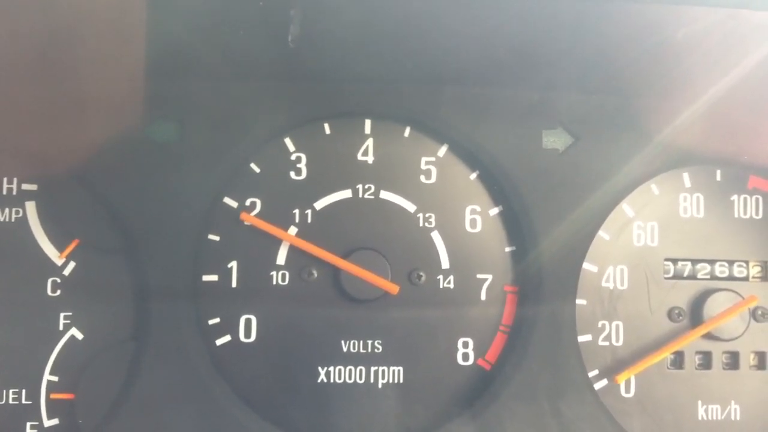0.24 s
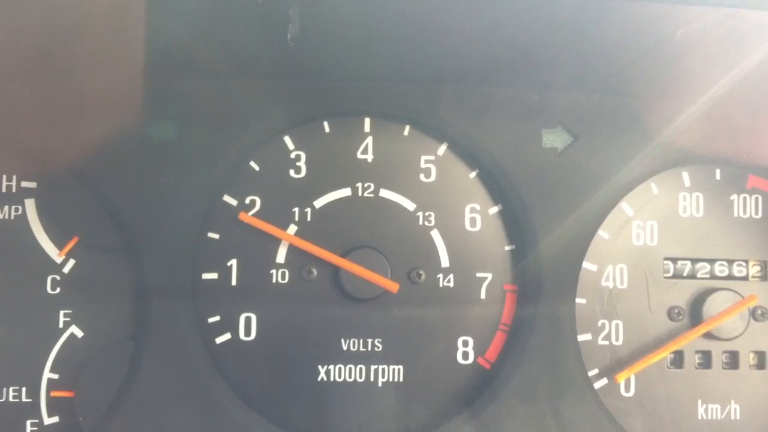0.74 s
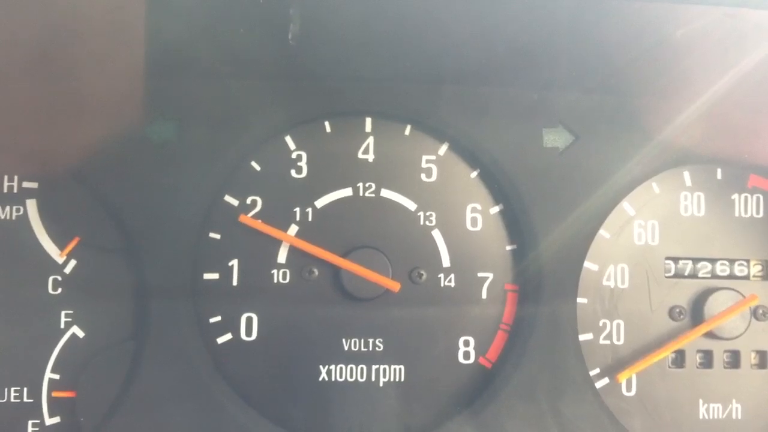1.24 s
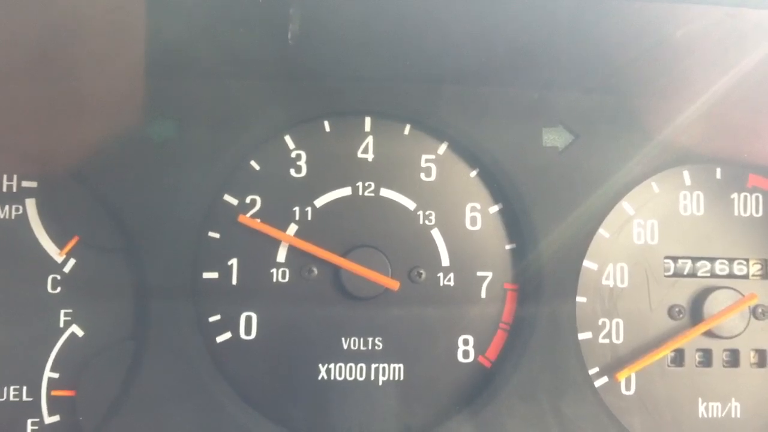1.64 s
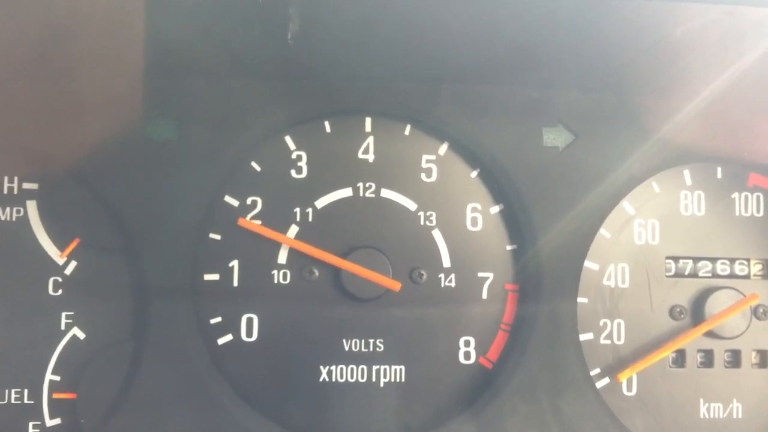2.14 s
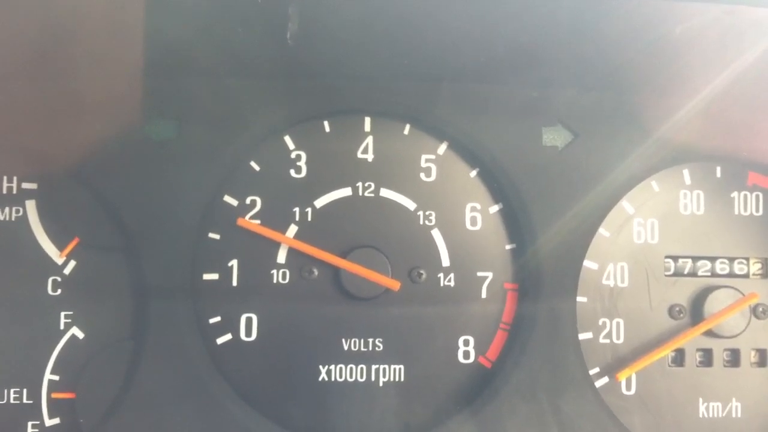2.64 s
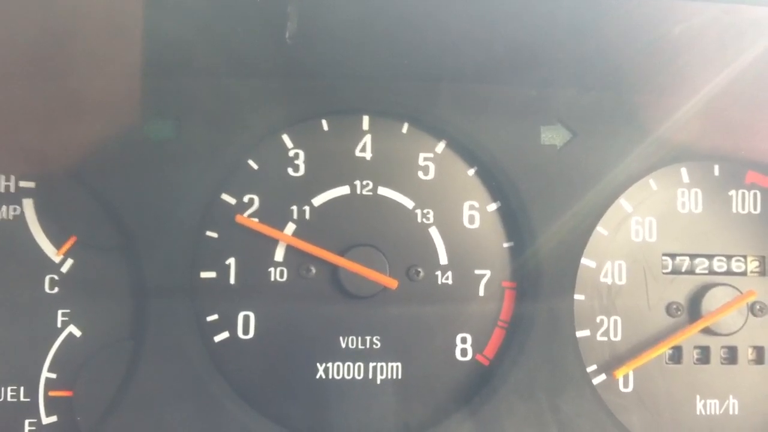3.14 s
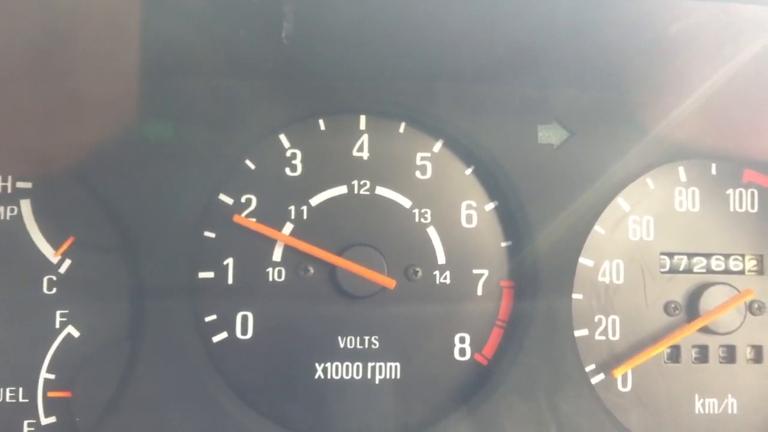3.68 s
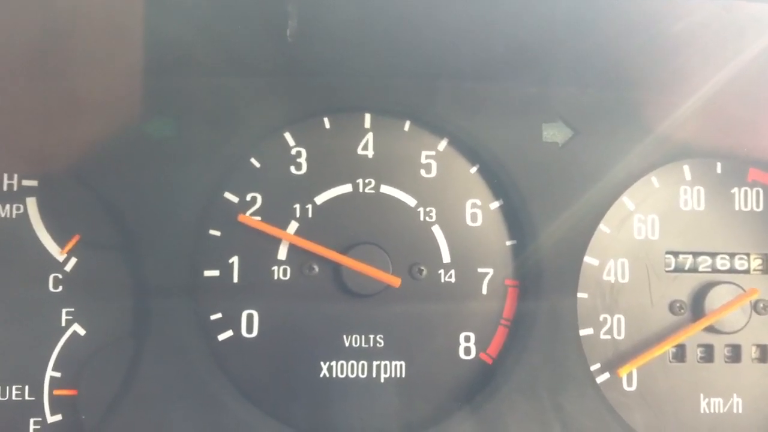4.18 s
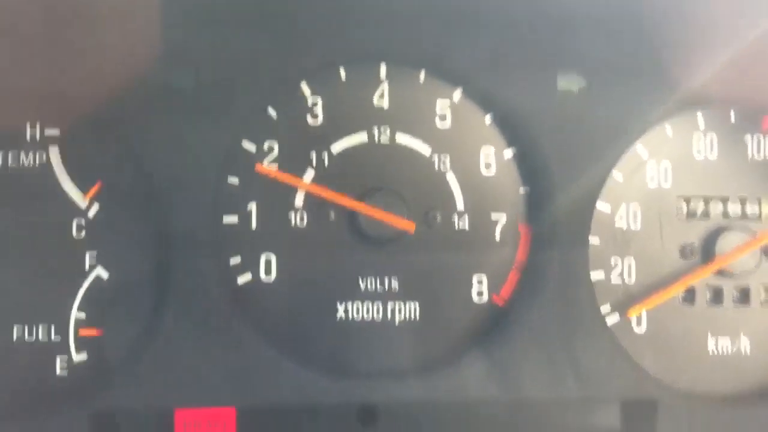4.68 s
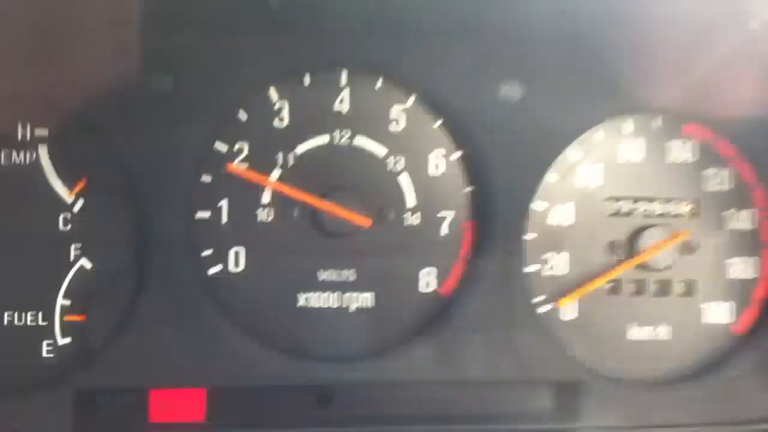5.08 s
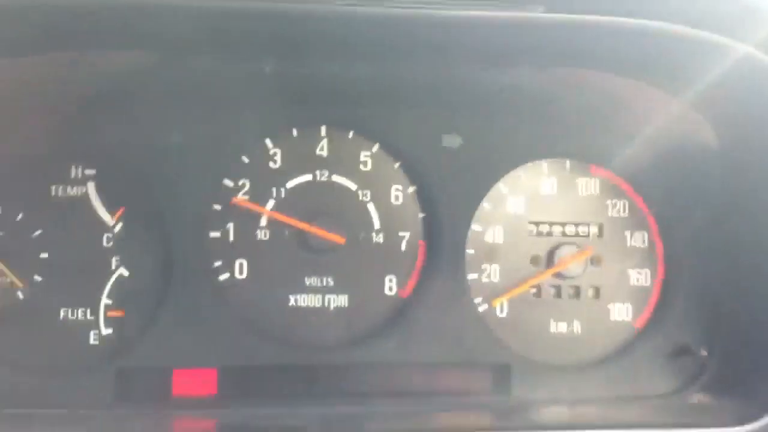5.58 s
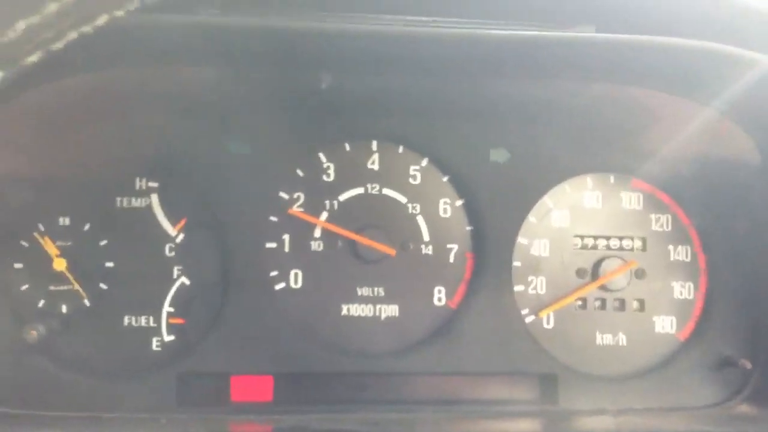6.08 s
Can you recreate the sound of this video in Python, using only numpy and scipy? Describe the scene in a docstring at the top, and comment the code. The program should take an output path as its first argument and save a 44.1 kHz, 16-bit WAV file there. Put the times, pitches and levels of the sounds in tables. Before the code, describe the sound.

From the driver's seat, a rotary engine idles in a lumpy pulse, surging and sagging about four times a second.

```python
"""A ported rotary engine lopes at a fast idle, heard from the driver's seat.
About four times a second it catches, speeds up over some six firings, then misfires and sags.
Intake air hisses ahead of each firing; the firing booms through exhaust and cabin and shakes the panels.
A driven accessory whines with the shaft throughout. Catches near 1.6, 3.2 and 5.1 s spit harder.
Mostly between 4.3 and 5.5 s the listener leans back from the dials and the tone colour shifts."""
import sys
import numpy as np
from scipy import signal
from scipy.fft import rfft, irfft, next_fast_len
from scipy.io import wavfile
from scipy.ndimage import uniform_filter1d, map_coordinates

SR = 44100
rng = np.random.default_rng(int(sys.argv[2]) if len(sys.argv) > 2 else 0)


def persist_wave(psi):
    """Save psi, clipped to +-1, as 16-bit WAV."""
    counts = np.round(np.clip(psi, -1, 1) * 32767).astype(np.int16)
    wavfile.write(sys.argv[1], SR, np.atleast_2d(counts).T)


N = 278712

# Spells of even loping. Each row: start in seconds, surge count, shaft turns per surge, stumbles as 0 or 1.
LOPE_SPELLS = [(-0.172, 3, 14, 0), (0.489, 1, 12, 0), (0.677, 4, 14, 1), (1.576, 4, 14, 1),
               (2.493, 1, 16, 1), (2.756, 4, 14, 0), (3.666, 1, 14, 1), (3.893, 1, 16, 1),
               (4.159, 3, 14, 1), (4.856, 1, 12, 1), (5.054, 1, 11, 0), (5.239, 2, 13, 0),
               (5.683, 3, 14, 0)]
# Combustion, clean surge then stumbling surge. Each row: share burnt on successive turns from the catch.
BURN_SHARES = [(1, 1, 1, 1, 1, .95, .25, 0), (1, .25, 1, 1, 1, .95, .45, .75)]
# Hard catches. Each row: time in seconds, extra firing level in dB, extra hiss in dB.
HARD_CATCHES = [(1.576, 0.5, 3.5), (3.209, 2, 4.5), (5.054, 1.5, 2.5)]
# Exhaust and cabin resonances. Each row: frequency in Hz, width in Hz, gain in dB.
BOOM_MODES = [(97, 8, -2), (110, 12, 3), (131, 16, 4.5), (187, 12, 6), (199, 13, 6), (221, 32, 5),
              (278, 20, -6), (338, 14, -7), (385, 20, -8), (504, 13, -1), (580, 50, -16)]
# Body shell transmission. Each row: frequency in Hz, gain at the dials in dB, gain leaning back in dB.
SHELL_GAINS = [(45, -18, -18), (62, -12.5, -9), (97, 2, -4), (139, -2.5, 2.5), (217, 1.5, 5), (233, 1.5, 1),
               (338, -0.5, -2), (524, -1, -6.5), (616, -5, -8), (790, -13.5, -7), (1500, -6, -20)]
# Listener position. Each row: time in seconds, lean from 0 (at the dials) to 1 (back).
LEAN_PATH = [(0, 0.09), (4.3, 0.18), (5.0, 0.38), (5.45, 1), (6.32, 0.92)]
# Engine bay and dash resonances. Each row: frequency in Hz, width in Hz, gain in dB.
PANEL_MODES = [(474.4, 15.3, 16.5), (587, 32, 7.5), (660, 24, 4.5), (940, 52, -8), (1053, 73, 14),
               (1273, 94, 2.5)]
# Intake hiss. Each row: frequency in Hz, relative density in dB.
INTAKE_SPECTRUM = [(600, -37), (1500, -3), (2500, 3.5), (3700, -0.5), (5300, 2), (6500, 1), (7800, -2.5),
                   (8900, 0.5), (10200, -4.5), (13000, -5), (15500, -9)]
# Accessory partials. Each row: harmonic number, level at the dials in dB, level leaning back in dB.
WHINE_PARTIALS = [(1, -49.5, -49), (2, -69, -51.5), (3, -54, -50), (4, -55, -53), (5, -52.5, -56),
                  (6, -56.5, -58.5)]
# Dash panel rung by the whine. Each row: frequency in Hz, width in Hz, gain in dB.
DASH_MODES = [(1072, 20, 8)]
# Narrow sizzle near 9 kHz in the hiss. Each row: frequency in Hz, relative density in dB.
SIZZLE_SPECTRUM = [(7000, -20), (8400, -11), (8900, 2), (9500, -6), (11000, -20)]
# Engine bay hollow. Each row: frequency in Hz, width in Hz, gain in dB.
HOLLOW_MODES = [(712.5, 14, 0)]
# Steady whirr. Each row: frequency in Hz, relative density in dB.
WHIRR_SPECTRUM = [(20, 3), (60, 11), (300, 18), (800, 17), (1400, 8), (2300, 3), (4500, 3), (6300, 0),
                  (7800, -2.5), (9000, -1), (12000, -6.5), (15500, -9)]

LOPE_END_S = 6.39
PIPE_ECHO_S, PIPE_ECHO_SHARE = .0084, .53
WHINE_CYCLES_PER_TURN = 17.08
FIRING_DB, FIRING_STUMBLE_DB, FIRING_LEAN_DB = -6.1, -.6, -1.35  # relative pulse sizes
GULP_DB, GULP_FADE_DB_PER_TURN, GULP_LEAN_DB = 3.7, .5, .5  # relative intake gulp sizes
TOP_HZ = 15800


def shaft(kick):
    """Firings add speed, friction takes it back. Per turn: time, share burnt, turn in surge, stumbles."""
    ends_s = [spell[0] for spell in LOPE_SPELLS[1:]] + [LOPE_END_S]
    rows = []
    for (start_s, surges, turns, stumbles), end_s in zip(LOPE_SPELLS, ends_s):
        turn = np.tile(np.arange(round(turns)), round(surges))
        burnt = np.pad(BURN_SHARES[round(stumbles)], (0, round(turns)))[turn]
        period = 1 / (1 + kick * np.cumsum(burnt - burnt.mean()))
        times_s = start_s + (end_s - start_s) * (np.cumsum(period) - period) / period.sum()
        rows += [(*row, round(stumbles)) for row in zip(times_s, burnt, turn)]
    return np.transpose(rows)


def spits(times_s, decay_s):
    """A hard catch fades over a few firings. Per turn: extra firing dB, extra hiss dB."""
    extra_db = np.zeros((2, len(times_s)))
    for start_s, bang_db, hiss_db in HARD_CATCHES:
        age_s = times_s - times_s[np.argmin(np.abs(times_s - start_s))]
        fade = (age_s >= 0) * np.exp(-np.abs(age_s) / decay_s)
        extra_db += np.outer([bang_db, hiss_db], fade)
    return extra_db


def charges(times_s, burnt, turn, stumbles):
    """Exhaust pulse and intake gulp sizes per turn. The rich charge after a misfire bangs hardest."""
    lean = np.interp(times_s, *np.transpose(LEAN_PATH))
    spit_bang_db, spit_hiss_db = spits(times_s, decay_s=.024)
    bang_db = FIRING_DB + FIRING_STUMBLE_DB * stumbles + FIRING_LEAN_DB * lean + spit_bang_db
    gulp_db = GULP_DB - GULP_FADE_DB_PER_TURN * turn + GULP_LEAN_DB * lean + spit_hiss_db
    rich_db = .8 * burnt * (1 - np.roll(burnt, 1))
    spread_db = np.where(burnt > .5, .7, 2.2)  # misfires are the most uneven
    bang_scatter, gulp_scatter = rng.standard_normal((2, len(times_s)))
    sizes = amp(bang_db + rich_db + spread_db * bang_scatter)
    gulps = burnt * amp(gulp_db + 1.56 * gulp_scatter)
    return sizes, gulps


def exhaust(times_s, sizes, burnt, jitter_s, gas_db, unburnt_db):
    """Each port opening sends a pulse down the pipe and rings the cabin. Bangs echo once."""
    times_s = times_s + jitter_s * rng.standard_normal(len(times_s))
    bangs = pulses(times_s, sizes * burnt)
    gas = puffs(times_s, sizes * burnt, rise_s=.001, decay_s=.007) * rng.standard_normal(N)
    bangs = bangs + amp(gas_db) * np.std(bangs) * gas
    echoed = filtered(bangs, lambda f: 1 + PIPE_ECHO_SHARE * np.exp(-2j * np.pi * f * PIPE_ECHO_S))
    unburnt = pulses(times_s - .002, sizes * (1 - burnt))
    dull_puffs = filtered(unburnt, lambda f: 1 / (1 + 1j * f / 200))
    drive = echoed + amp(unburnt_db) * dull_puffs
    cabin = lambda f: ring(BOOM_MODES, f) * band(f, 70, 404) * band(f, 70, 4000)
    return -unit(filtered(drive, cabin))


def body_shell(x, lean):
    """The body muffles the exhaust; the colour depends on the place in the cabin."""
    hz, near_db, back_db = np.transpose(SHELL_GAINS)
    return (1 - lean) * coloured(x, hz, near_db) + lean * coloured(x, hz, back_db)


def panel_rasp(times_s, sizes, steady):
    """The engine shakes the panels, harder at each firing."""
    shake = (steady + puffs(times_s, sizes, rise_s=.0016, decay_s=.014)) * rng.standard_normal(N)
    return unit(filtered(shake, lambda f: ring(PANEL_MODES, f) * band(f, 240, 1440)))


def intake(times_s, gulps, lead_s, grain_db):
    """Air hisses in just ahead of each firing, slightly gritty."""
    flow = puffs(times_s - lead_s, gulps, rise_s=.016, decay_s=.0105)
    return flow * unit(noise(INTAKE_SPECTRUM) * amp(grain_db * wobble(700)))


def accessory_whine(times_s, lean, slip, flutter_db, fuzz, swell_db):
    """A belt-driven accessory tracks the shaft and swells with its speed; its overtones are fuzzy."""
    mid_turn_s = (times_s[1:] + times_s[:-1]) / 2
    shaft_hz = np.interp(np.arange(N) / SR, mid_turn_s, 1 / np.diff(times_s))
    whine_hz = WHINE_CYCLES_PER_TURN * shaft_hz * (1 + slip * wobble(60))
    phase = 2 * np.pi * np.cumsum(whine_hz) / SR
    surge = unit(shaft_hz - uniform_filter1d(shaft_hz, size=SR // 2))
    whine = np.zeros(N)
    for k, near_db, back_db in WHINE_PARTIALS:
        blur = 1 + fuzz * (k > 1) * (k + 2) / 2 * (wobble(220) + 1j * wobble(220))
        partial = np.real(blur * np.exp(1j * k * phase))
        envelope = amp(flutter_db * wobble(25) + swell_db * surge / k)
        whine += amp(near_db + lean * (back_db - near_db)) * unit(envelope * partial)
    dash = filtered(whine, lambda f: ring(DASH_MODES, f))
    return whine + (1 - lean) * dash


def high_sizzle(times_s, sizes, spread_db):
    """Narrow sizzle near 9 kHz in the hiss, uneven from firing to firing."""
    bursts = sizes * amp(spread_db * rng.standard_normal(len(times_s)))
    return puffs(times_s, bursts, rise_s=.0022, decay_s=.0085) * noise(SIZZLE_SPECTRUM)


def bay_howl():
    """A hollow in the engine bay rings with noise."""
    return unit(filtered(rng.standard_normal(N), lambda f: ring(HOLLOW_MODES, f) ** 2))


def background(whirr_db, rumble_db):
    """Steady whirr over a faint rumble."""
    whirr = noise(WHIRR_SPECTRUM)
    rumble = noise([(12, -4), (28, 0), (55, -2), (120, -18), (400, -70)])
    return amp(whirr_db) * whirr + amp(rumble_db) * rumble


def amp(db):
    """Amplitude ratio from dB."""
    return 10 ** (np.asarray(db) / 20)


def unit(x):
    """x scaled to rms 1."""
    return x / np.sqrt(np.mean(x ** 2) + 1e-20)


def wobble(rate_hz):
    """Smooth random curve, rate_hz knots a second."""
    knots = rng.standard_normal(int(N * rate_hz / SR) + 4)
    return map_coordinates(knots, [np.arange(N) * rate_hz / SR])


def filtered(x, response):
    """x through a complex frequency response."""
    size = next_fast_len(N + SR // 2)
    return irfft(rfft(x, size) * response(np.fft.rfftfreq(size, 1 / SR)), size)[:N]


def coloured(x, hz, db):
    """x through a gain curve on a log-frequency axis."""
    return filtered(x, lambda f: amp(np.interp(np.log(f + 1), np.log(hz), db)))


def noise(spectrum):
    """Noise of rms 1 shaped by (Hz, dB) points."""
    return unit(coloured(rng.standard_normal(N), *np.transpose(spectrum)))


def ring(modes, f):
    """Causal response of a set of resonances."""
    return sum(amp(db) * 1j * f * width_hz / (hz * hz - f * f + 1j * f * width_hz)
               for hz, width_hz, db in modes)


def band(f, low_hz, high_hz):
    """Causal band-pass, second-order edges."""
    lo, hi = 1j * f / low_hz, 1j * f / high_hz
    return lo * lo / (lo * lo + lo + 1) / (hi * hi + np.sqrt(2) * hi + 1)


def pulses(times_s, sizes):
    """One impulse at each time."""
    at = np.round(times_s * SR).astype(int)
    inside = (at >= 0) & (at < N)
    return np.bincount(at[inside], sizes[inside], N)


def puffs(times_s, sizes, rise_s, decay_s):
    """Envelope of rms 1; each puff's power swells and decays."""
    t = np.arange(SR // 4) / SR
    shape = (1 - np.exp(-t / rise_s)) ** 2 * np.exp(-t / decay_s)
    power = signal.fftconvolve(pulses(times_s, sizes ** 2), shape)[:N]
    return unit(np.sqrt(np.abs(power)))


def scene():
    """One shaft times exhaust, panels, intake, sizzle and whine, over steady noise."""
    times_s, burnt, turn, stumbles = shaft(kick=.02)
    sizes, gulps = charges(times_s, burnt, turn, stumbles)
    lean = np.interp(np.arange(N) / SR, *np.transpose(LEAN_PATH))
    pipe = exhaust(times_s, sizes, burnt, jitter_s=.0002, gas_db=-7, unburnt_db=-7)
    boom = amp(-17) * body_shell(pipe, lean)
    panels = amp(-38 - 2.6 * lean) * panel_rasp(times_s, sizes * burnt, steady=1.3)
    howl = amp(-48.5) * bay_howl()
    hiss = amp(-43) * intake(times_s, gulps, lead_s=.014, grain_db=1.5)
    sizzle = amp(-53.5) * high_sizzle(times_s, gulps, spread_db=3)
    bed = background(whirr_db=-38, rumble_db=-59)
    whine = accessory_whine(times_s, lean, slip=.00323, flutter_db=2.5, fuzz=.35, swell_db=.5)
    return boom + panels + howl + hiss + sizzle + bed + whine


def record(dry):
    """Mono, cut above TOP_HZ."""
    return filtered(dry, lambda f: f < TOP_HZ)[None]


dry = scene()
out = record(dry)
persist_wave(out)
```